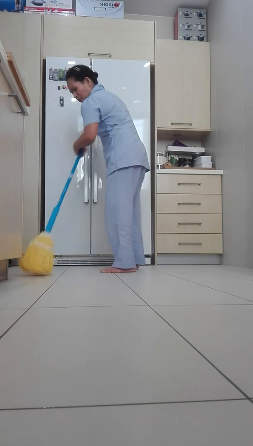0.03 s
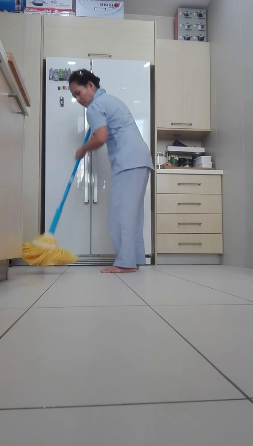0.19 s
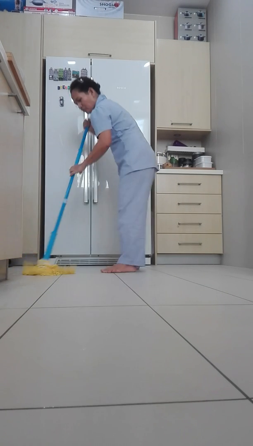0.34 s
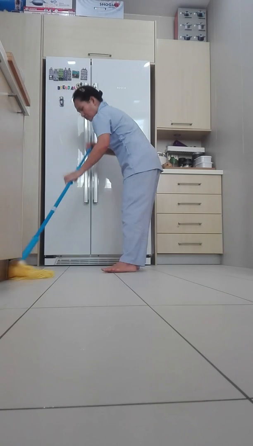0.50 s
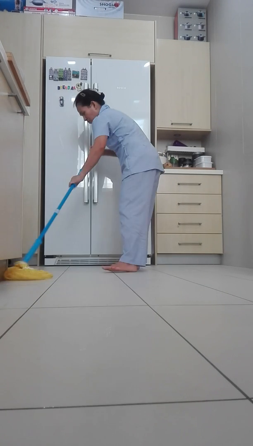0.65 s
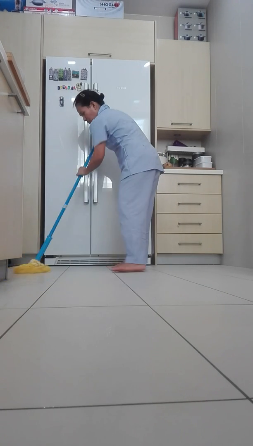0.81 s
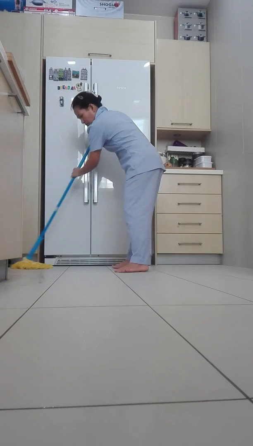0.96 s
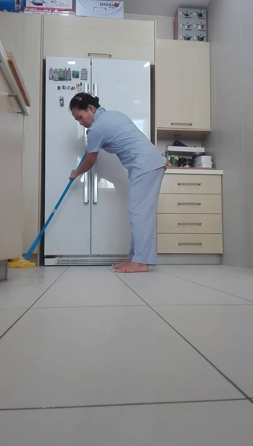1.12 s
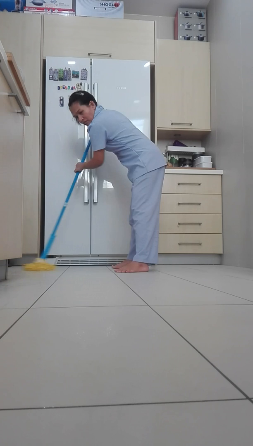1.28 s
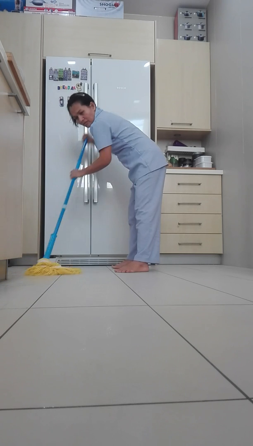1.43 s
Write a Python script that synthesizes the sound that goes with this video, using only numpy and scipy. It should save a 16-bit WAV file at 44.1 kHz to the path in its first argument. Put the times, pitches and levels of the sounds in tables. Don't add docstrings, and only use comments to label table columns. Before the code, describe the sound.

A wet string mop works on kitchen tiles. Strands swish faintly until 0.36 s, when the mop drops with a deep soft thud, wet slap, fizzing spray and tiny drips. At 0.59 s its head cracks against a hollow wooden plinth, which booms briefly. Quiet dragging and scuffs follow, then a much lighter slap at 1.37 s. A refrigerator hums faintly; the small hard room reverberates shortly.

```python
import sys
import numpy as np
from scipy import signal
from scipy.fft import rfft, irfft
from scipy.io import wavfile
from scipy.ndimage import uniform_filter1d

SR = 44100
rng = np.random.default_rng(int(sys.argv[2]) if len(sys.argv) > 2 else 0)


def store_pcm(level_fs):
    pcm = np.round(np.clip(level_fs, -1, 1) * 32767).astype(np.int16)
    wavfile.write(sys.argv[1], SR, np.atleast_2d(pcm).T)


def linear_from_db(decibels):
    return 10 ** (np.asarray(decibels, float) / 20)


N = 63945


def white():
    return rng.standard_normal(N)


def evened(x):
    return x / np.sqrt(np.mean(x ** 2) + 1e-20)


def read(points, hz):
    f, value = np.transpose(points)
    return np.interp(np.log(hz + 1), np.log(f + 1), value)


def since(s):
    return np.maximum(np.arange(N) / SR - s, 0)


def curve(points, order=1):
    rows = np.array(points)
    return np.interp(np.arange(N) / SR, rows[:, 0], rows[:, order])


def colour(x, points, low_db):
    hz = np.fft.rfftfreq(N, 1 / SR)
    below = low_db * np.log2(np.maximum(points[0][0] / (hz + 1), 1))
    return evened(irfft(rfft(x) * linear_from_db(read(points, hz) + below), N))


def resonate(x, hz, width_hz):
    turn = np.exp(2j * np.pi * np.cumsum(hz * np.ones(N)) / SR)
    r = np.exp(-np.pi * width_hz / SR)
    return 2 * (turn * signal.lfilter([1 - r], [1, -r], x / turn)).real


def grainy(spread_db, size):
    flicker = evened(uniform_filter1d(white(), size))
    return white() * linear_from_db(spread_db * flicker)


def ring(modes, s, contact_s):
    t = since(s)
    push = 1 - np.exp(-t / contact_s)
    return push * sum(linear_from_db(db - 60 * t / t60) * np.sin(2 * np.pi * hz * t) for hz, db, t60 in modes)


def tone(points, order):
    waver_db = 1.5
    smooth = uniform_filter1d(white(), size=900)
    waver = evened(uniform_filter1d(smooth, size=900))
    level = np.sqrt(2) * linear_from_db(curve(points, order + 1) + waver_db * waver)
    phase = 2 * np.pi * np.cumsum(curve(points, order)) / SR
    return level * np.sin(phase + 0.41 * waver)


# f/Hz, width/Hz, level/dB
HUM = [(149.3, 7.5, -55.5), (222.3, 20, -64.5), (251, 17, -65.5), (350.6, 8, -66)]
# t/s, low tone f/Hz, level/dB, upper tone f/Hz, level/dB
MOTOR = [(0, 120.8, -44, 196.6, -53.5), (.15, 123, -46, 189.8, -48), (.33, 123.8, -46.5, 191.3, -56.5),
         (.5, 126.2, -50.5, 190.6, -52), (.75, 123, -47, 190.8, -48), (.9, 124.8, -55.5, 191.1, -66),
         (1.0, 131.5, -53.5, 193.4, -53), (1.1, 143.7, -48.5, 194.2, -63.5),
         (1.19, 145.2, -51, 193.5, -52.5), (1.26, 125.6, -53, 192.5, -53.5), (1.32, 128, -55, 191, -52),
         (1.345, 134.9, -65, 193.4, -64), (1.4, 146, -54, 194.4, -58.5), (1.45, 134, -61, 190, -45.5)]
# t/s, f/Hz, level/dB
WHINE = [(0, 1972, -77), (.12, 1972, -77), (.16, 1972, -70), (.26, 1972, -71), (.3, 1975, -77),
         (.7, 1980, -75), (.93, 1982, -72), (.97, 1885, -74), (1.17, 1880, -73), (1.22, 1880, -85),
         (1.45, 1880, -85)]
# f/Hz, level/dB per Hz
AIR = [(12, -42), (20, -4.5), (74, -5.5), (154, -7), (198, -5), (485, -17), (5500, -38), (10000, -39.5),
       (16000, -38)]
AIR_DB = -51


def fridge():
    hum = np.zeros(N)
    for hz, width_hz, db in HUM:
        narrow = resonate(white(), hz, width_hz)
        hum += linear_from_db(db) * evened(resonate(narrow, hz, 2 * width_hz))
    tones = tone(MOTOR, order=1) + tone(MOTOR, order=3) + tone(WHINE, order=1)
    return hum + tones + linear_from_db(AIR_DB) * colour(white(), AIR, -7)


# t/s, level/dB
DRAG = [(0, -56.5), (.07, -64), (.19, -71), (.3, -57.5), (.36, -54.5), (.5, -58.5), (.58, -51), (.72, -62),
        (.9, -63), (.96, -60), (1.02, -55.5), (1.11, -58), (1.15, -60.5), (1.27, -60.5), (1.33, -60.5),
        (1.45, -55.5)]
# f/Hz, level/dB per Hz
DRAG_COLOUR = [(180, -59), (300, -3.5), (418, -2), (546, -27), (725, -6), (1190, -8), (11500, -18.5),
               (16000, -30)]
# t/s, half length/s, level/dB, f/Hz
SCUFFS = [
    (0.558, 0.037, -52.5, 870),
    (0.755, 0.024, -56, 735),
    (0.969, 0.024, -58.5, 980),
    (1.042, 0.042, -58, 1470),
    (1.331, 0.019, -56, 640),
    (0.236, 0.043, -61.5, 870),
]
SCUFF_WIDTH_OVER_HZ = 1.27
SWISH_AT_S, SWISH_S, SWISH_DB, SWISH_HZ, SWISH_WIDTH_HZ = 1.012, .025, -62.5, 9000, 9000


def drag():
    t = np.arange(N) / SR
    rub = grainy(1.7, size=150)
    scuff = np.zeros(N)
    for s, half_s, db, hz in SCUFFS:
        width_hz = SCUFF_WIDTH_OVER_HZ * hz
        dull = evened(resonate(resonate(rub, hz, width_hz), hz, width_hz))
        scuff += linear_from_db(db) * np.exp(-((t - s) / half_s) ** 2) * dull
    bright = evened(resonate(grainy(1.5, size=120), SWISH_HZ, SWISH_WIDTH_HZ))
    u = since(SWISH_AT_S) / SWISH_S
    swish = linear_from_db(SWISH_DB) * u * np.exp(1 - u) * bright
    return swish + linear_from_db(curve(DRAG)) * colour(grainy(0.99, size=200), DRAG_COLOUR, -5) + scuff


# t/s, level/dB, f/Hz, width/Hz
DRIPS = [(0.3695, -46, 12800, 1500), (0.3818, -37, 1500, 1500), (.3822, -39, 8400, 2500),
         (0.393, -32, 7000, 9000), (.3952, -35, 9500, 3000), (0.408, -44, 4760, 1500),
         (0.5233, -54, 5870, 1500), (.5235, -50, 12000, 8000), (0.538, -48, 12000, 6000),
         (.549, -53, 12500, 3000), (0.548, -51, 4900, 2500), (.297, -63, 11000, 1500),
         (1.3875, -47.5, 11500, 4500), (1.3903, -51, 5200, 1500), (1.3915, -53, 11500, 5000),
         (1.3965, -51, 12000, 4000), (1.4455, -52, 9000, 9000), (1.3757, -48, 14000, 4000)]
DRIP_S = 0.0012
# f/Hz, level/dB, t60/s
BUBBLE = [(3430, -42, 0.018)]
BUBBLE_AT_S = .567


def drips():
    noise = white()
    out = ring(BUBBLE, BUBBLE_AT_S, DRIP_S)
    for s, db, hz, width_hz in DRIPS:
        u = since(s) / DRIP_S * np.sqrt(width_hz / 1500)
        out = out + linear_from_db(db) * u * np.exp(1 - u) * evened(resonate(noise, hz, width_hz))
    return out


# t/s, level/dB, contact/s
THUDS = [
    (.3596, -16, 0.011),
    (1.372, -34.5, 0.013),
    (1.312, -43, 0.011),
]
# f/Hz, level/dB, t60/s
THUD_MODES = [(94.4, -14, 0.22), (123, 0, 0.081), (145.6, -5, 0.14), (201, -3, 0.052), (258, 3, 0.024),
              (342.7, -24.5, 0.18)]


def thuds():
    return sum(-linear_from_db(db) * ring(THUD_MODES, s, contact_s) for s, db, contact_s in THUDS)


SLAP_AT_S = [.3612, .3798, 1.3766, 1.4452]
# snap level/dB, spray level/dB, spray t60/s, brightness/dB
SLAPS = [
    (-42, -42, 0.24, -2),
    (-17.5, -35.5, 0.28, 0.2),
    (-41, -51, 0.47, 1),
    (-47, -57, 0.11, -3),
]
# f/Hz, level/dB, t60/s
SNAP = [(846, 1.5, 0.0044), (1254, -20, 0.019), (2102, -14, 0.021), (3120, -4, 0.0026), (4800, 1, 0.0031),
        (6670, -1.5, 0.0032), (8200, -3, .0025), (9700, -1, 0.0016), (11700, 4.5, 0.0023),
        (14500, -1, 0.0025)]
SNAP_S = .00015
# f/Hz, level/dB per Hz
SPRAY = [(150, -19), (250, 6.5), (354, 2.5), (875, 2), (1180, -3.5), (2490, -4), (3580, -18), (9490, -14),
         (16000, -26)]
# f/Hz, width/Hz, level/dB, t60 as multiple of the spray's
SPRAY_RINGS = [(905, 95, -0.5, 1.1), (1311, 33, -7.5, 1.1), (1636, 22, -6.5, 2.1), (1978, 100, 0, 1.1),
               (2433, 85, -3, 1.7), (2688, 160, -4, 1.9), (4110, 170, -9, 1.3), (5150, 550, 1, 1.3),
               (9500, 2100, 2.5, 1.1), (12000, 2300, 1, .9)]
RING_SHARE_DB, SPRAY_RISE_S, SPRAY_GRAIN_DB = -7, 0.00065, 2
BURST_DB, BURST_T60_S, BRIGHT_HZ = -11, 0.014, 1100
# f/Hz, level/dB, t60/s
TAP = [(1258, -41.5, 0.052), (1726, -47, 0.063), (2014, -43.5, 0.062), (2700, -51, 0.031), (5200, -54, .03),
       (5900, -52, .03)]


def slaps():
    spray = colour(grainy(SPRAY_GRAIN_DB, size=60), SPRAY, -6)
    rings = []
    for hz, width_hz, db, linger in SPRAY_RINGS:
        band = evened(resonate(grainy(SPRAY_GRAIN_DB, size=150), hz, width_hz))
        rings.append((linear_from_db(RING_SHARE_DB + db) * band, linger))
    out = ring(TAP, SLAP_AT_S[2], SNAP_S)
    for s, (snap_db, spray_db, t60, bright_db) in zip(SLAP_AT_S, SLAPS):
        t = since(s)
        tail = (linear_from_db(-60 * t / t60) + linear_from_db(BURST_DB - 60 * t / BURST_T60_S)) * spray
        tail = tail + sum(linear_from_db(-60 * t / (t60 * linger)) * band for band, linger in rings)
        low = signal.lfilter(*signal.butter(1, BRIGHT_HZ, fs=SR), tail)
        tail = low * linear_from_db(-bright_db) + (tail - low) * linear_from_db(bright_db)
        out += linear_from_db(snap_db) * ring(SNAP, s, SNAP_S)
        out += linear_from_db(spray_db) * (1 - np.exp(-t / SPRAY_RISE_S)) * tail
    return out


def chirp(s, length_s, top_hz, end_hz, db):
    u = np.minimum(since(s) / length_s, 1)
    cycles = length_s * u * (top_hz + (end_hz - top_hz) * u / 2)
    return linear_from_db(db) * np.sqrt(abs(np.sin(np.pi * u))) * np.sin(2 * np.pi * cycles)


KNOCK_AT_S = [.5907, .5915, .5939]
KNOCKS = [
    -31,
    -26,
    -26.5,
]
# f/Hz, level/dB, t60/s
CRACK = [(1330, -22, 0.0091), (1840, -9, 0.0034), (2400, -11, 0.013), (2930, -20, 0.0026),
         (3600, -1.5, 0.0027), (4500, 0, 0.0039), (5760, -8.5, 0.0056), (6930, -6, 0.0048),
         (12500, -8.5, 0.0028)]
# t/s, length/s, top f/Hz, end f/Hz, level/dB
CHIRPS = [
    (.5916, .0029, 4800, 700, -22.5),
    (.5903, .002, 3200, 900, -32),
    (.5935, .004, 7800, 3600, -44),
    (.5907, .0016, 6800, 4600, -33),
]
# f/Hz, level/dB, t60/s
HEAD = [(357, -21.5, 0.024), (866, -29.5, 0.034), (1230, -24, 0.014), (2320, -33, .02), (2920, -36, 0.016),
        (3630, -34, 0.021)]
HEAD_AT_S, HEAD_CONTACT_S = .5905, .0008
# f/Hz, level/dB per Hz
RATTLE = [(500, 5), (950, -5.5), (2800, -20.5), (3600, -13.5), (6000, -20), (11000, -28), (16000, -42)]
RATTLE_DB, RATTLE_T60_S = -32, 0.22
# f/Hz, level/dB, t60/s
PLINTH = [(76.4, -2, 0.029), (108, -24, 0.16), (128, -16.5, 0.69), (133.7, -3, 0.22), (158, 0, 0.134),
          (175.5, -2.5, 0.11), (224.4, -19.5, 0.24), (274, -30, 0.18), (310, -23, 0.18), (378, -34, 0.11),
          (463.7, -12.5, 0.15), (576, -13, 0.064), (723, -23, 0.097)]
PUSH_AT_S, PUSH_DB, PUSH_S = .5936, -15, 0.0095
DAMP_AT_S, DAMP_DB, DAMP_S = .648, -8.5, .004


def knock():
    crack = sum(linear_from_db(db) * ring(CRACK, s, SNAP_S) for s, db in zip(KNOCK_AT_S, KNOCKS))
    t = since(KNOCK_AT_S[1])
    rattle_level = (t > 0) * linear_from_db(RATTLE_DB - 60 * t / RATTLE_T60_S)
    rattle = rattle_level * colour(grainy(3.3, size=100), RATTLE, -2.3)
    head = ring(HEAD, HEAD_AT_S, HEAD_CONTACT_S) + sum(chirp(*row) for row in CHIRPS)
    damp = linear_from_db(DAMP_DB * (1 - np.exp(-since(DAMP_AT_S) / DAMP_S)))
    boom = -damp * linear_from_db(PUSH_DB) * ring(PLINTH, PUSH_AT_S, PUSH_S)
    return crack + rattle + head, boom


# f/Hz, half width/Hz, level/dB
DIPS = [(3060, 400, -3), (7100, 670, -1.5)]


def floor_reflection(x):
    hz = np.fft.rfftfreq(N, 1 / SR)
    dip_db = sum(db * np.exp(-((hz - f) / half_hz) ** 2) for f, half_hz, db in DIPS)
    return irfft(rfft(x) * linear_from_db(dip_db), N)


# f/Hz, t60/s
ROOM = [(100, 0.36), (500, 0.24), (2000, 0.34), (8000, 0.32), (16000, 0.31)]
ROOM_DB = -10.5


def room(x):
    taps = np.zeros(SR // 2)
    at = np.arange(180, SR // 2 - 20, 20)
    taps[at + rng.integers(0, 20, len(at))] = rng.choice([-1., 1.], len(at))
    hz, t, z = signal.stft(taps, SR, nperseg=256)
    decay = linear_from_db(-60 * t / read(ROOM, hz)[:, None])
    tail = signal.istft(z * decay, SR, nperseg=256)[1]
    return signal.fftconvolve(x, tail / np.linalg.norm(tail))[:N]


def scene():
    crack, boom = knock()
    mop = floor_reflection(drag() + drips() + slaps() + crack)
    return (mop + linear_from_db(ROOM_DB) * room(mop) + boom + thuds() + fridge())[None]


def low_pass(x):
    return signal.sosfilt(signal.butter(12, 15500, fs=SR, output="sos"), x)


def record(dry):
    edge_hz, slope_hz, top_db = 15500, 200, -14
    above = np.clip((np.fft.rfftfreq(N, 1 / SR) - edge_hz) / slope_hz, 0, 1)
    mix = irfft(rfft(dry) * linear_from_db(top_db * above), N)
    return low_pass(mix)


dry = scene()
out = record(dry)
store_pcm(out)
```